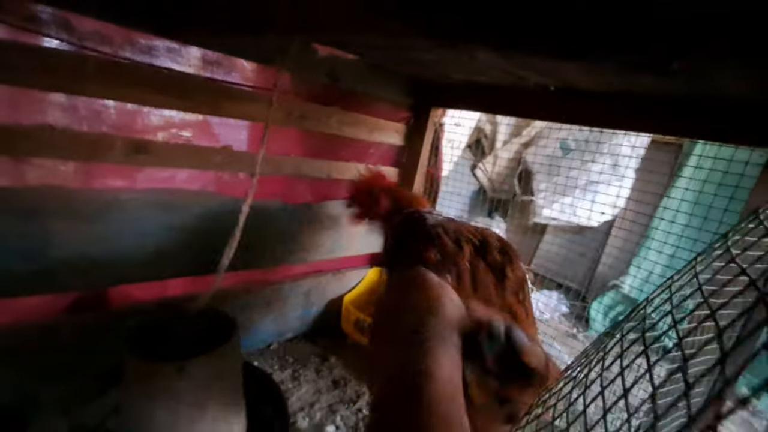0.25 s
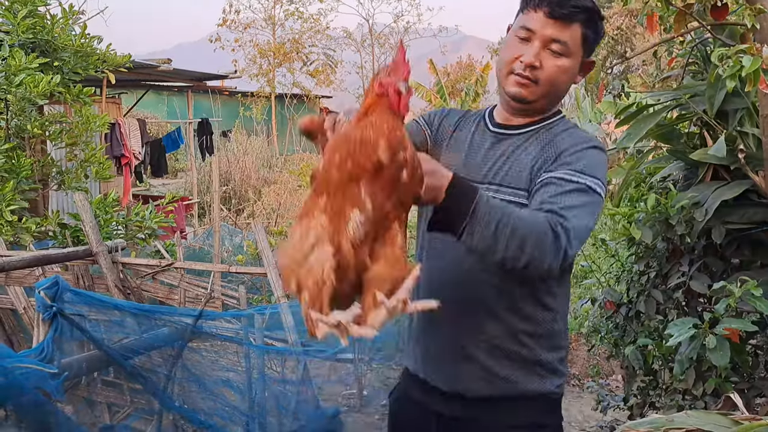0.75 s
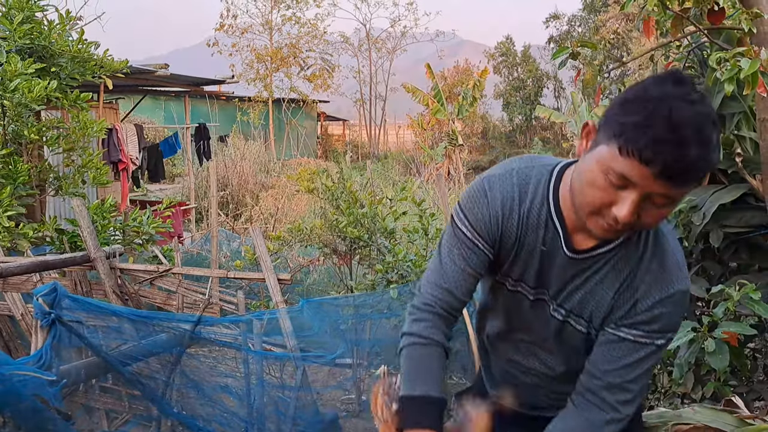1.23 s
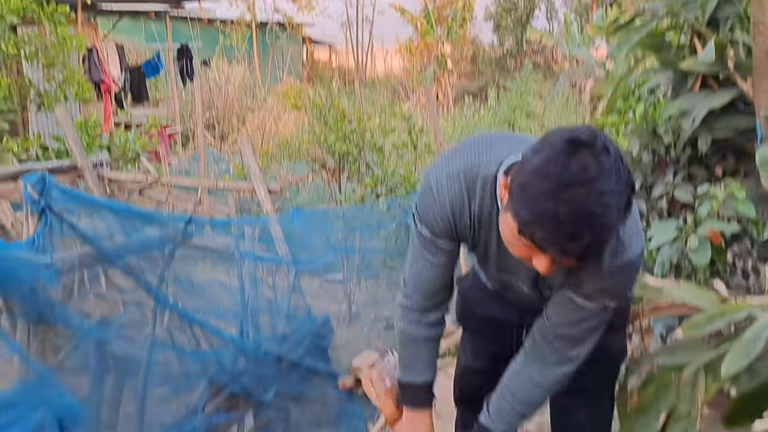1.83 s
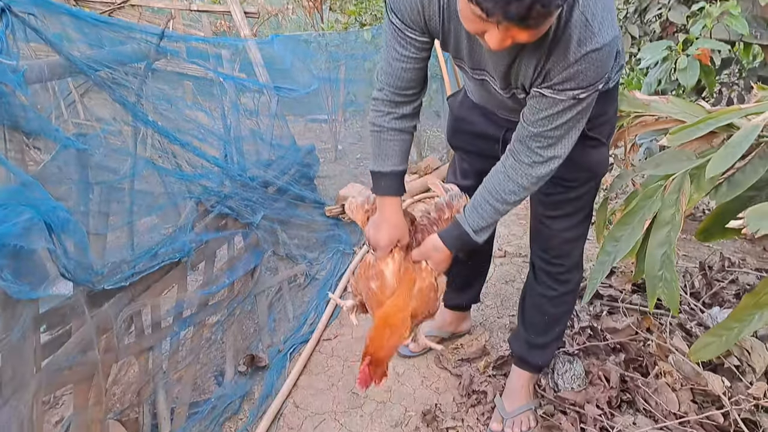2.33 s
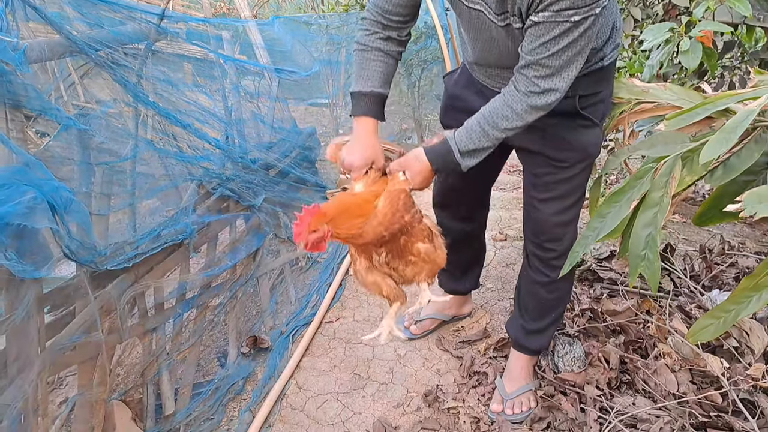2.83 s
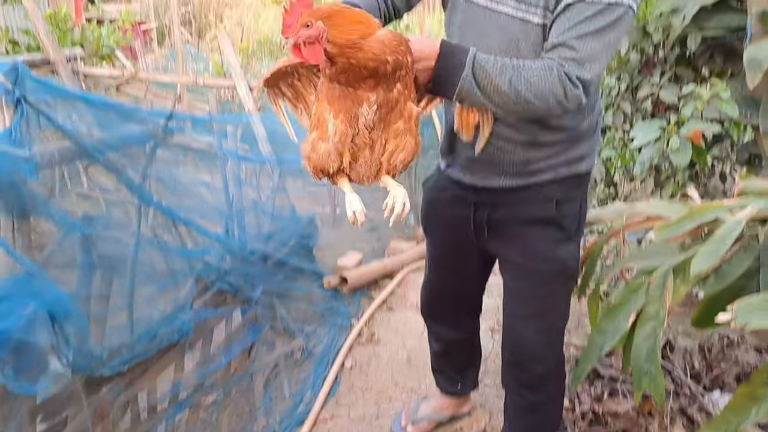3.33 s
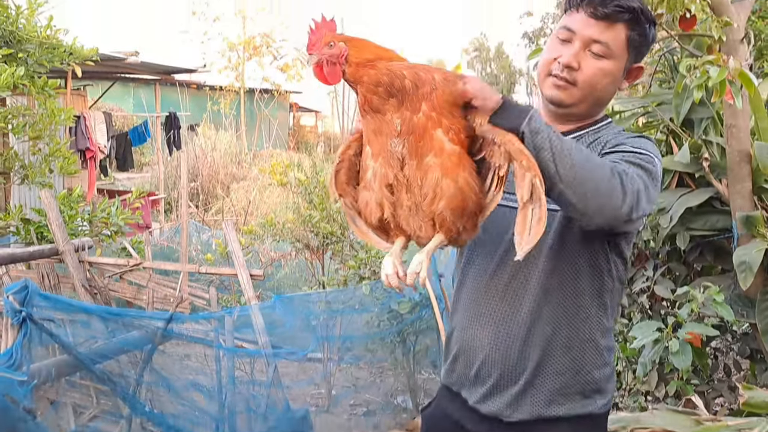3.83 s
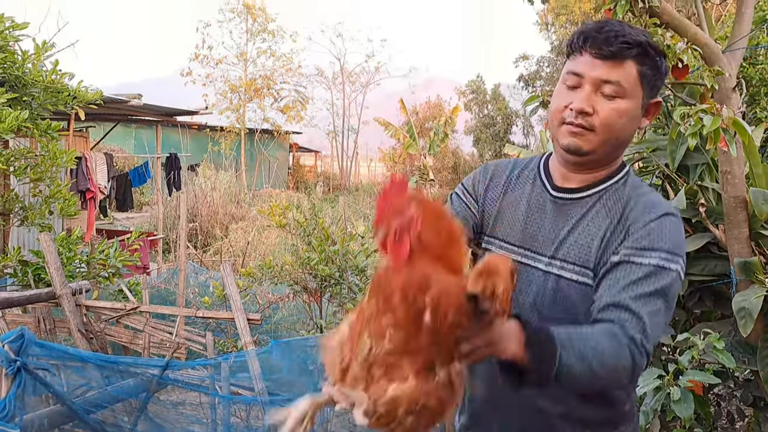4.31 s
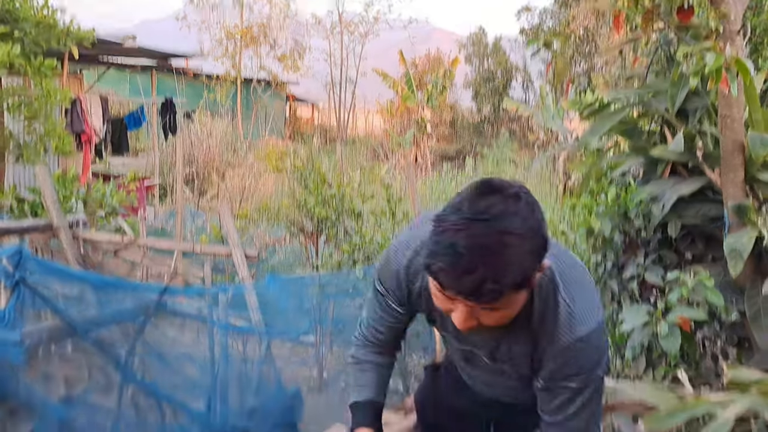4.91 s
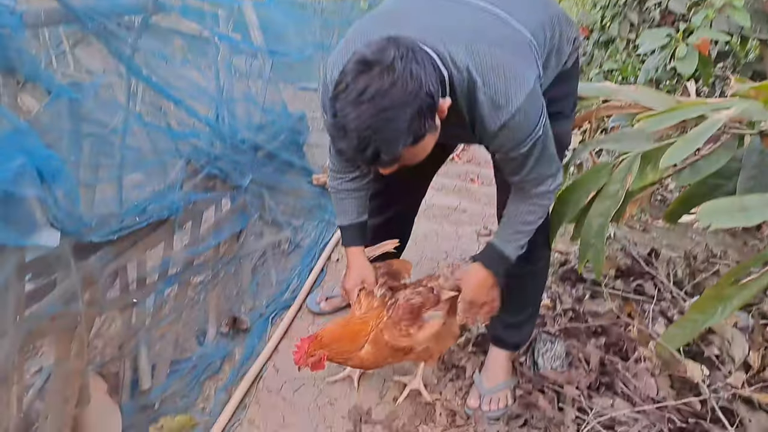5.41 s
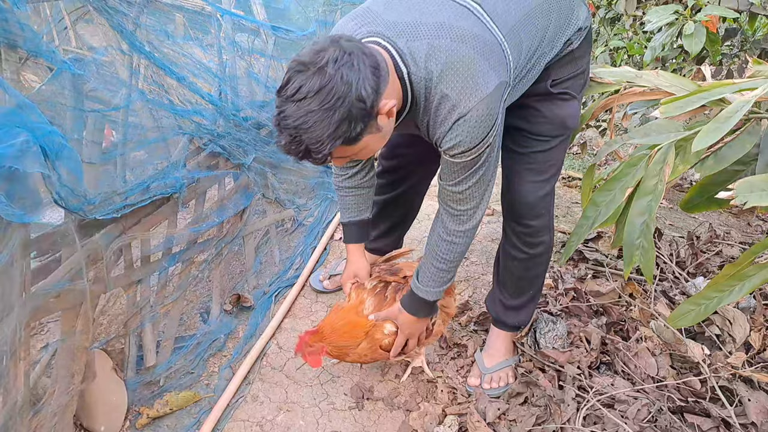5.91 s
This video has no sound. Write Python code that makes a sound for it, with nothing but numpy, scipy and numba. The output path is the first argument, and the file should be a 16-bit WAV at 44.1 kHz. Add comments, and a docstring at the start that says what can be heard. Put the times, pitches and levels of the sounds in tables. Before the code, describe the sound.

Close up in a small boxy coop, a chicken clucks fast and gruffly with feather rustle and hard thumps. An abrupt cut opens to a yard: a wing flurry, a harsh scream, then shorter whines and clucks. Other chickens answer faintly over a soft distant engine. The bird squawks twice more, and dry leaves snap underfoot before it quiets.

```python
"""A chicken clucks in a boxy coop as it is grabbed, then screams, flaps and squawks while held out in a yard.
Its rough syrinx is a jittered pulse train with noise, ringing a throat resonance that moves with the beak.
Other chickens answer from further off by the same mechanism, and a songbird whistles once.
Rustling feathers and leaves are grainy noise; wings and feet thump as damped noise with a low ring.
Dry leaves tick as resonant cracks; a distant engine idles as low harmonics and rumble over soft air noise."""
import sys
import numpy as np
from scipy import signal
from scipy.fft import rfft, irfft, next_fast_len
from scipy.io import wavfile
from scipy.ndimage import uniform_filter1d
from numba import njit

SR = 44100
rng = np.random.default_rng(int(sys.argv[2]) if len(sys.argv) > 2 else 0)


def file_out(sig):
    """Save sig as 16-bit WAV at sys.argv[1]."""
    # one column per channel
    cols = np.atleast_2d(sig).T
    # limit, then scale
    lim = np.clip(cols, -1, 1)
    pcm = np.round(lim * 32767).astype(np.int16)
    wavfile.write(sys.argv[1], SR, pcm)


N = 271744
T = np.arange(N) / SR
YARD_S, LIFTED_S = 0.69, 3.0  # coop gives way to yard; held bird is lifted
SILENT_DB = -80
# a call starts flat and closed, and sags as the beak shuts: factors on pitch and throat resonance
ONSET_BEND, ONSET_THROAT = 0.86, 0.65
END_BEND, END_THROAT = 0.88, 0.62

# feather noise spectrum in the coop: hz, gain_db
COOP_FEATHER_SPECTRUM = [(88, -36), (150, -8.5), (431, -14.5), (805, -11.5), (960, -32), (1450, -9.5),
                         (2920, -19.5), (3770, -17), (4240, -20), (13400, -22.5), (16000, -27)]
# left minus right in the yard: hz, difference_db
YARD_LEFT_RIGHT = [(300, -3), (1100, -0.2), (2200, 4.5), (4300, 15.5), (6000, 12), (8500, 2.5),
                   (12000, -11.5)]


def undb(db):
    """Decibels to gain."""
    return 10 ** (np.asarray(db) / 20)


def unit(x):
    """Scale to rms 1."""
    return x / np.sqrt(np.mean(x ** 2) + 1e-18)


def even(x, size=400):
    """Hold the short-term rms at 1; size in samples."""
    return x / np.sqrt(np.abs(uniform_filter1d(x ** 2, size)) + 1e-12)


def on_bins(points, size):
    """Interpolate (Hz, dB) points over log frequency to a gain per FFT bin."""
    hz, db = np.transpose(points)
    bin_hz = np.fft.rfftfreq(size, 1 / SR)
    return undb(np.interp(np.log(bin_hz + 1), np.log(hz), db))


def colour(x, points):
    """Filter by a spectrum of (Hz, dB) points."""
    size = next_fast_len(x.shape[-1] + 1024)
    return irfft(rfft(x, size) * on_bins(points, size), size)[..., :x.shape[-1]]


def walk(t, rate_hz):
    """Random levels, rate_hz a second, joined by lines."""
    place = (t - t[0]) * rate_hz
    levels = rng.standard_normal(2 ** 14)
    i = place.astype(int) % (2 ** 14 - 1)
    return levels[i] + place % 1 * (levels[i + 1] - levels[i])


def add(out, start_s, x):
    """Mix x into out from start_s."""
    i = max(int(start_s * SR), 0)
    out[i:i + len(x)] += x[:N - i]


@njit
def resonate(x, hz, q):
    """State-variable band-pass with a moving centre."""
    y, band, low = np.empty(len(x)), 0., 0.
    for i in range(len(x)):
        g = np.tan(np.pi * min(hz[i] / SR, .45))
        v = (band + g * (x[i] - low)) / (1 + g * (g + 1 / q))
        band, low, y[i] = 2 * v - band, low + 2 * g * v, v / q
    return y


def stereo(x, left_right, lag_ms):
    """Left and right differ in level by frequency at constant total power; the right lags."""
    size = next_fast_len(N + 1024)
    ratio = on_bins(left_right, size)
    lag = np.exp(-2j * np.pi * np.fft.rfftfreq(size, 1 / SR) * lag_ms / 1000)
    gains = np.array([ratio, lag]) * np.sqrt(2 / (1 + ratio ** 2))
    return irfft(rfft(x, size) * gains, size)[:, :N]


def echoes(x, t60_s, wet_db, dull_hz, delay_s):
    """Scattered reflections: dulled, exponentially decaying noise, independent left and right."""
    t = T[:SR * 3 // 4]
    tail = rng.standard_normal((2, len(t))) * np.exp(-np.log(1000) * t / t60_s) * (t > delay_s)
    tail /= np.sqrt(np.sum(tail[0] ** 2))
    tail = signal.lfilter(*signal.butter(1, dull_hz, fs=SR), tail)
    return undb(wet_db) * signal.fftconvolve(x[None], tail, axes=1)[:, :N]


def engine():
    """A distant engine throbs at three unsteady low harmonics over rumble, swelling and falling."""
    # rumble spectrum: hz, gain_db
    rumble_spectrum = [(21, -32.5), (35, -14), (60, 6), (114, -0.5), (127, -3), (151, -27), (220, -51.5),
                       (290, -54.5), (480, -120)]
    engine_hz, peak_s, peak_db, coop_db = 57, 3.78, -42, -63
    rise_db_per_s, fall_db_per_s = 3, 6.5
    phase = 2 * np.pi * np.cumsum(engine_hz * (1 + .03 * walk(T, 13))) / SR
    throb = unit(np.sin(phase) + 1.1 * np.sin(2 * phase) + 0.033 * np.sin(3 * phase))
    noise = rng.standard_normal(N) + 0.12 * rng.standard_normal((2, N))  # mostly shared left and right
    rumble = unit(colour(noise, rumble_spectrum))
    swell_db = peak_db - np.maximum((peak_s - T) * rise_db_per_s, (T - peak_s) * fall_db_per_s)
    level = undb(np.where(T < YARD_S, coop_db, swell_db))
    return unit(throb + undb(3.5) * rumble) * level * undb([[1.4], [-1.4]])


def outdoor_air():
    """Soft, nearly mono coloured noise with a wandering level."""
    # air spectrum: hz, gain_db
    air_spectrum = [(59, -21.5), (100, -1), (163, -6), (621, -15.5), (768, -14), (1200, -25.5),
                    (1580, -33.5), (1910, -25), (4980, -35.5), (12400, -53.5), (16000, -37.5)]
    noise = rng.standard_normal(N) + 0.13 * rng.standard_normal((2, N))
    return unit(colour(noise, air_spectrum)) * undb(-57 + 3.3 * walk(T, 9.9) + walk(T, 33))


def songbird(start_s, length_s, from_hz, to_hz, level_db):
    """One thin falling whistle from far-off trees: a sine under a half-sine envelope."""
    out, part = np.zeros(N), np.linspace(0, 1, int(length_s * SR))
    hz = from_hz + (to_hz - from_hz) * part
    add(out, start_s, undb(level_db) * np.sin(np.pi * part) * np.sin(2 * np.pi * np.cumsum(hz) / SR))
    return out


def bursts(rows):
    """Gain of rustles that each swell and die exponentially; overlaps add in power."""
    power = 0
    for peak_s, level_db, rise_s, fall_s in rows:
        power = power + undb(2 * level_db) * np.exp(-2 * np.maximum((peak_s - T) / rise_s, (T - peak_s) / fall_s))
    return np.sqrt(power)


def rustle(gain, spectrum, grain_db, flutter_db):
    """Countless barbs or leaves catch and slip, in patches; left and right get their own grains."""
    grains = rng.standard_normal((2, N)) * undb(grain_db * walk(T, 1500))
    patches = undb(flutter_db * walk(T, 120))
    return unit(colour(grains, spectrum) * patches) * gain


def ticks(decay_s, q, gain_db):
    """Dry leaves and twigs snap: each a brief crack with a broad resonance."""
    # snaps: start_s, level_db (before gain_db), resonance_hz
    snaps = [(1.125, -34.5, 2090), (1.1872, -38.5, 3080), (3.2702, -52, 2420), (4.435, -31, 4150),
             (4.4494, -45, 4070), (4.7094, -31, 5900), (5.1766, -38, 5300), (5.3833, -28, 12200),
             (5.419, -25, 10170), (5.546, -41.5, 12000), (5.5797, -40.5, 5080), (6.0205, -40.5, 7550),
             (6.1133, -51, 6560)]
    out, t = np.zeros(N), T[:SR // 30]
    for start_s, level_db, hz in snaps:
        burst = rng.standard_normal(len(t)) * np.exp(-t / decay_s)
        crack = resonate(burst, np.full(len(t), float(hz)), float(q))
        add(out, start_s, undb(level_db + gain_db) * crack / np.abs(crack).max())
    return out


def leaves():
    """Dry leaves rustle and snap underfoot."""
    # steps: peak_s, level_db, rise_s, fall_s
    steps = [(5.185, -51.5, 0.15, 0.065), (5.39, -28.5, 0.013, 0.015), (5.42, -36, .03, 0.016),
             (5.44, -47, 0.19, 0.12), (6.12, -60.5, 0.259, 0.23)]
    # leaf noise spectrum: hz, gain_db
    leaf_spectrum = [(180, -44), (300, -16), (398, -2.5), (494, -20.5), (801, -15.5), (946, -13),
                     (1190, -11.5), (5160, -5.5), (12500, -11.5), (16000, -15.5)]
    return rustle(bursts(steps), leaf_spectrum, grain_db=3, flutter_db=3.0) + ticks(decay_s=0.0035, q=1.0, gain_db=5.5)


def wings():
    """Wings and feathers rustle in the yard."""
    # wingbeats: peak_s, level_db, rise_s, fall_s
    wingbeats = [(.83, -17.5, .085, .098), (1.52, -48.5, .3, .42), (3.8, -54.5, .6, .3),
                 (4.11, -41.5, .06, .08), (4.44, -47, .2, .1), (4.7, -47.5, .08, .05)]
    # feather noise spectrum: hz, gain_db
    wing_spectrum = [(88, -57.5), (150, -33), (231, -24.5), (534, -15), (589, -21.5), (923, -3.5),
                     (1240, -9), (3350, -3), (3620, -3), (6510, -7), (7320, -13), (12700, -11.5),
                     (16000, -27)]
    beats = rustle(bursts(wingbeats) * (T > YARD_S), wing_spectrum, grain_db=3.5, flutter_db=2.0)
    return stereo(beats, YARD_LEFT_RIGHT, lag_ms=0)


def scuffles():
    """Feathers rustle against hands and coop over a steady bed of rustling."""
    # scuffle bursts: peak_s, level_db, rise_s, fall_s
    scuffle_bursts = [(.125, -40, 0.024, 0.11), (.255, -36, 0.015, 0.033), (.33, -39.5, 0.059, 0.055),
                      (.5, -30, .025, .025), (.56, -18, 0.019, 0.013), (.615, -21.5, 0.0015, 0.031)]
    gain = np.hypot(bursts(scuffle_bursts), undb(-51.5)) * (T < YARD_S)
    return rustle(gain, COOP_FEATHER_SPECTRUM, grain_db=3.0, flutter_db=0.5)


def flap():
    """A wing beats against the arm: feather noise without its treble."""
    # the wing stroke: peak_s, level_db, rise_s, fall_s
    wing_stroke = (.48, -22, .008, .02)
    stroke = rustle(bursts([wing_stroke]), COOP_FEATHER_SPECTRUM, grain_db=2.5, flutter_db=3)
    return signal.sosfilt(signal.butter(2, 2800, fs=SR, output="sos"), stroke)


def thumps(board_hz, board_db):
    """Blows of wings and feet: quickly damped dull noise and a low ring, without deep bass."""
    # blows: start_s, level_db, decay_s
    blows = [(.484, -17, 0.042), (0.531, -25.5, 0.027), (0.637, -6.5, 0.012), (0.659, -10, 0.0068),
             (1.061, -37.5, 0.043), (1.604, -38, 0.022), (4.259, -41.5, 0.034)]
    # blow noise spectrum: hz, gain_db
    blow_spectrum = [(24, -35.5), (40, 2.5), (197, -11), (315, -10), (573, -15.5), (670, -14.5),
                     (750, -21.5), (841, -4.5), (956, -22), (1200, -32.5), (1560, -57), (2640, -120)]
    out, t = np.zeros(N), T[:SR // 4]
    for start_s, level_db, decay_s in blows:
        boom = even(colour(rng.standard_normal(len(t)), blow_spectrum), size=700)
        boom += undb(board_db) * np.sin(2 * np.pi * board_hz * t)
        add(out, start_s, undb(level_db) * boom * (1 - np.exp(-t / 0.001)) * np.exp(-t / decay_s))
    return signal.sosfilt(signal.butter(4, 55, "high", fs=SR, output="sos"), out)


def syrinx(t, phase, hz, count=38):
    """Overtones of the pulse train; the windpipe spreads each pulse, its resonances shift as the neck twists."""
    out = 0
    for k in range(2, count):
        shift_db = min(.7 * (k - 1), 4) * walk(t, 24)
        out = out + undb(shift_db) * np.cos(k * phase + .17 * k ** 2) * (k * hz < SR / 2)
    return unit(out)


def voice(rows, rasp_spectrum, q, jitter):
    """Syrinx pulses, uneven and noisy when forced, ring the throat; upper harmonics and air rasp."""
    # rows: time_s, pitch_hz, roughness, level_db, throat_hz, fundamental_db re throat, rasp_db re level
    s, hz, rough, db, throat_hz, root_db, rasp_db = np.transpose(rows)
    t = np.arange(int(s[0] * SR), int(s[-1] * SR)) / SR
    controls = (hz, rough, undb(db), throat_hz, root_db, rasp_db)
    hz, rough, loud, throat_hz, root_db, rasp_db = (np.interp(t, s, c) for c in controls)
    wobble = jitter * rough * walk(t, 600) + .006 * walk(t, 110)
    phase = 2 * np.pi * np.cumsum(hz * (1 + wobble)) / SR
    # under strain every second pulse weakens, and air bursts through once a cycle
    overtones = syrinx(t, phase, hz) * (1 + .62 * rough * np.cos(phase / 2))
    air = unit(rng.standard_normal(len(t)) * (1 + .5 * np.cos(phase)))
    source = overtones + 1.7 * np.abs(rough) ** 1.8 * air
    throat = even(resonate(resonate(source, throat_hz, float(q)), throat_hz, float(q)))
    root_noise = unit(resonate(resonate(air, hz, 3.0), hz, 3.0))
    root = even(np.sin(phase) + 1.1 * rough * root_noise)
    # the louder the call, the more turbulent air in its treble
    treble = signal.butter(6, 2550, "high", fs=SR, output="sos")
    rasp = even(colour(signal.sosfilt(treble, source + 2.2 * loud * air), rasp_spectrum))
    body = (throat + undb(root_db) * root) / np.sqrt(1 + undb(root_db) ** 2)
    # a forced syrinx sputters
    sputter = undb(rough * (1.8 * walk(t, 350) + 2 * walk(t, 110)))
    out = np.zeros(N)
    add(out, s[0], loud * sputter * (body + undb(rasp_db) * rasp))
    return out


def softening(db):
    """As the bird eases off, the rasp fades faster than the note: 0.41 dB per dB, over 17 dB."""
    return 0.41 * np.maximum(np.asarray(db) - np.max(db), -17)


def cluck(row, rasp_spectrum, q, jitter):
    """A cluck starts gruff and flat, clears at the top of its arch, then sags and fades."""
    s, rise, fall, db, hz, glide, rough, throat_hz, root_db, rasp_db = row
    attack, clearing = min(.009, rise / 2), min(.011, rise / 2)  # s
    times = np.array([0, attack, rise - clearing, rise, rise + fall / 2, rise + fall])
    opening = np.array([1.5, 1, .4, 0, 0, 0])
    closing = np.array([0, 0, 0, 0, .3, 1])
    glide_octaves = glide / 12 * (times - rise) / (rise + fall)
    pitch = hz * ONSET_BEND ** opening * END_BEND ** closing * 2 ** glide_octaves
    throat = throat_hz * ONSET_THROAT ** opening * END_THROAT ** closing
    roughness = np.clip(rough + 0.332 * opening + 0.093 * closing, 0, 1)
    level = [SILENT_DB, db - 10.5, db - 8.5, db, db - 8.5, SILENT_DB]
    root = np.where(opening > 0, min(root_db, 11), root_db)  # weaker fundamental while gruff
    rasp = rasp_db + softening(level)
    rows = np.column_stack([s + times, pitch, roughness, level, throat, root, rasp])
    return voice(rows, rasp_spectrum, q, jitter)


def clucks(start_s, end_s, rasp_spectrum, q, jitter):
    """All the main bird's short clucks that start between two times."""
    # clucks: start_s, rise_s, fall_s, level_db, pitch_hz (at the peak), glide_semitones, roughness (0-1),
    # throat_hz, fundamental_db (re throat), rasp_db (re level)
    cluck_rows = [(0.043, 0.023, 0.042, -19, 611.3, -7, 0.25, 1030, 38, -37),
                  (0.119, 0.017, 0.013, -17, 482.4, 4.5, .65, 920, -8.5, -40),
                  (0.139, .016, 0.067, -6, 588.7, 0, 0.11, 1610, 21.5, -24),
                  (.275, .032, 0.026, -10.5, 540, 2.5, 0.42, 910, 20, -28.5),
                  (.324, .018, 0.022, -13.5, 392.3, 2, .5, 740, -6, -47.5),
                  (0.43, 0.029, 0.011, -5.5, 583, -2.5, 0.36, 1026, 29, -32),
                  (.512, 0.021, .034, -10, 590.3, -3, 0.25, 1100, 34, -45.5),
                  (.628, .016, 0.026, -19.5, 372.5, 3, 0.21, 740, -21.5, -35),
                  (1.348, 0.03, 0.028, -19.5, 485.7, -0.5, 0.15, 1130, -13, -10.5),
                  (1.742, 0.035, 0.04, -21, 433.7, -2, 0, 1390, -9.5, -10),
                  (3.951, .031, .028, -16, 413.9, 0.5, .7, 924, -9.5, -13.5),
                  (4.04, .037, .015, -14.5, 434.7, 5, .25, 840, -12, -20),
                  (4.908, 0.029, 0.031, -18, 471.3, 2.5, 0.14, 1100, -2, -14.5),
                  (5.322, 0.026, 0.021, -18.5, 419, 3.5, 0, 856, -11, -16.5),
                  (5.885, 0.028, 0.044, -22, 406.3, 3.5, 0.22, 983, 2.5, -14.5)]
    return sum(cluck(row, rasp_spectrum, q, jitter) for row in cluck_rows if start_s <= row[0] < end_s)


def squawk(controls, rasp_spectrum, q, jitter, strain, gain_db, root_db, rasp_db):
    """A long call with quick attack and release; the rasp follows the opening of the beak."""
    s, hz, rough, db, throat_hz = np.transpose([controls[0], *controls, controls[-1]]).astype(float)
    s[0] -= .01  # attack, s
    s[-1] += .0073  # release, s
    db[[0, -1]] = SILENT_DB
    hz[[0, -1]] *= ONSET_BEND, END_BEND
    throat_hz[[0, -1]] *= ONSET_THROAT, END_THROAT
    # an open beak raises the throat resonance and lets out more rasp: 4.5 dB per octave
    rasp = rasp_db + 4.5 * np.log2(throat_hz / throat_hz.mean()) + softening(db)
    rough = np.clip(strain * rough, .07, 1)
    rows = np.column_stack([s, hz, rough, db + gain_db, throat_hz, np.full(len(s), root_db), rasp])
    return voice(rows, rasp_spectrum, q, jitter)


def flock():
    """Others answer with a squawk and arched clucks; low clucks are soft croons, mostly fundamental."""
    # flock clucks: start_s, length_s, level_db (before fade_db), pitch_hz, throat_hz, rasp_db (re level)
    flock_clucks = [(1.705, 0.042, -49, 688, 1370, -9), (1.88, 0.053, -45.5, 717, 1320, 1),
                    (2.277, .05, -48.5, 691.7, 1352, 4.5), (2.512, 0.053, -43.5, 688.4, 1340, -2.5),
                    (2.66, 0.054, -53, 425.3, 830, -27), (2.74, 0.054, -41.5, 704, 1290, -4.5),
                    (2.99, 0.053, -42, 696.4, 1350, -5.5), (3.073, 0.06, -55.5, 476, 940, -18),
                    (3.212, 0.074, -57.5, 398, 1067, -30), (3.444, 0.061, -47, 572, 1111, -8),
                    (3.595, 0.073, -52, 490, 1000, -14), (3.704, 0.1, -56, 505, 996, -16.5),
                    (5.26, 0.0664, -56, 344, 705, -33), (5.46, 0.11, -59, 345, 709, -30),
                    (5.6, 0.1128, -67, 444, 687, -32), (5.85, 0.047, -61, 349.4, 700, -30)]
    # answering squawk: time_s, pitch_hz, roughness (before strain), level_db, throat_hz
    answer = [(2.198, 601, 0.97, -39.5, 1100), (2.234, 591.6, 0.12, -40.5, 1530),
              (2.26, 617, 0.088, -36, 1660), (2.282, 601, 0.47, -46, 1146), (2.294, 505.6, 0.42, -34, 1110),
              (2.318, 509.6, 0.14, -33.5, 1010), (2.406, 492, 0.13, -42.5, 970),
              (2.44, 467, 0.71, -43.5, 920)]
    # rasp spectrum: hz, gain_db
    flock_rasp = [(1590, -48), (2700, -79), (3060, -8), (3480, 25), (3750, 16), (4220, 21.5), (4580, 14),
                  (5360, 14), (6170, -1.5), (16000, -15)]
    # shape of a cluck: part of length, bend (factor), roughness, fade_db
    arch = [(0, .85, 0.59, -23.5), (.35, 0.93, 0.52, 4), (.6, 1, .35, 5.5), (1, .9, 0.532, -31)]
    rows = []
    for s, length, db, hz, throat_hz, rasp_db in flock_clucks:
        root_db = np.interp(hz, (340, 500), (14, -14))
        for part, bend, rough, fade_db in arch:
            rows.append((s + part * length, hz * bend, rough, db + fade_db, throat_hz * bend, root_db, rasp_db))
    call = squawk(answer, flock_rasp, q=0.91, jitter=0.093, strain=0.87, gain_db=0, root_db=-9.5, rasp_db=-41)
    return call + voice(rows, flock_rasp, q=1.27, jitter=.05)


def coop():
    """The bird clucks and thumps in the coop's boxy ring and short echoes, amid feather noise."""
    # rasp spectrum: hz, gain_db
    coop_rasp = [(1470, -34), (2500, -27), (4240, -7.5), (4730, -3), (4950, -12), (5920, -10), (16000, -47)]
    # the small coop's boxy ring: hz, gain_db
    box_ring = [(420, 4), (600, -0.5), (740, 7.5), (950, 6), (1500, -3.5), (2300, 14), (3200, -3)]
    # left minus right: hz, difference_db
    coop_left_right = [(300, 2), (1000, 4), (2200, -7.5), (4500, 21), (12000, -15.5)]
    inside = colour(clucks(0, YARD_S, coop_rasp, q=3.6, jitter=0.14), box_ring)
    inside += thumps(board_hz=240.3, board_db=-9.5)
    direct = stereo(inside, coop_left_right, lag_ms=0)
    reflected = echoes(inside, t60_s=0.051, wet_db=-5, dull_hz=2850, delay_s=0.0036)
    return direct + reflected + scuffles() + flap()


def held_out(call, pan_db, lag_ms):
    """Each holding position has its own direction and reflections off ground and handler."""
    direct = stereo(call, YARD_LEFT_RIGHT, lag_ms) * undb(np.array([[pan_db], [-pan_db]]) / 2)
    return direct + echoes(call, t60_s=.046, wet_db=-9, dull_hz=8400, delay_s=.0013)


def held_bird():
    """The bird screams as it is swung out, complains while lowered, squawks when lifted, then cries."""
    # long calls: time_s, pitch_hz, roughness (before strain), level_db (before gain_db), throat_hz
    scream_rows, wail_rows, whine_rows = [(0.875, 619.4, 1.04, -23, 1450), (0.935, 609.4, 0.8, -12, 1870),
                                          (0.955, 606, 0.67, -17.5, 2140), (0.989, 568.2, 0.97, -13, 2090),
                                          (1.003, 502.6, 0.89, -15.5, 2020),
                                          (1.019, 503.6, 0.25, -10, 1710), (1.045, 522.7, 0, -12, 1480),
                                          (1.065, 556.5, 0.64, -14.5, 1065),
                                          (1.088, 527, 0.86, -28.5, 1000)], [(1.45, 572, 0.61, -28, 1160),
                                                          (1.464, 589, 0.85, -33, 1130),
                                                          (1.474, 541, 0.84, -26, 1120),
                                                          (1.492, 552, 0.48, -23, 1100),
                                                          (1.508, 554.4, 0.04, -26.5, 1230),
                                                          (1.528, 498.3, 0.03, -18, 1350),
                                                          (1.562, 476.7, 0.15, -24, 1220),
                                                          (1.585, 518, 1, -47, 1180)], [(1.972, 416, 0.99, -32, 1176),
                                                                        (2.006, 446.8, 0.12, -25.5, 1210),
                                                                        (2.028, 481.6, 0.55, -27, 1590),
                                                                        (2.052, 490, 0.87, -29, 1830),
                                                                        (2.064, 460, 0.47, -26.5, 1660),
                                                                        (2.084, 445, 0.42, -31, 1400),
                                                                        (2.108, 494, 0.018, -22.5, 1600),
                                                                        (2.132, 470, 0.2, -30, 1440),
                                                                        (2.155, 377, 0.99, -39.5, 1350)]
    squawk_rows, cry_rows = [(4.2, 451, 0.66, -26.5, 1310), (4.214, 428.7, 0.33, -17.5, 1320),
                             (4.226, 458, 0.06, -12, 1340), (4.262, 440.5, 0.02, -20.5, 1300),
                             (4.29, 464, 0.03, -9.5, 1320), (4.314, 479.4, 0.02, -12.5, 1340),
                             (4.354, 435.4, 0.09, -19.5, 1110), (4.362, 447, 0.19, -25.5, 1080)], [(4.539, 443.3, 0.88, -16.5, 1000),
                                             (4.547, 478, 0.45, -20.5, 1000),
                                             (4.553, 508, 0.5, -10.5, 1020),
                                             (4.595, 499, 0.94, -15.5, 1000),
                                             (4.669, 468.4, 0.21, -11, 932), (4.683, 416, 0.23, -15, 908),
                                             (4.693, 435, 0.63, -23.5, 901)]
    # rasp spectra: hz, gain_db
    scream_rasp, protest_rasp = [(1590, -32), (2700, -10), (3090, -2), (3830, -15), (4280, -3.5),
                                 (5050, -5), (5360, -5), (6600, -6), (10500, -23), (12600, -24.5),
                                 (16000, -35)], [(1590, -1), (2700, 3), (2760, -37), (3610, -11),
                                                      (3920, -7), (4190, -46), (4350, 3), (5770, 6),
                                                      (6360, -0.5), (8820, -8.5), (10300, -12.5),
                                                      (12700, -5), (16000, -24)]
    squawk_rasp, cry_rasp = [(1710, -30), (2900, -11), (3010, -12), (3090, -2), (3270, 8.5), (3940, -54.5),
                             (4610, -31.5), (4920, -37.5), (5970, 4), (6500, -9.5), (7720, 0.5),
                             (9160, -22.5), (9430, -36.5), (11900, -11.5), (16000, -21.5)], [(1590, -75.5), (2700, 0), (3020, -6), (3250, -18),
                                                  (3860, -13), (4510, -18), (4720, -13), (5200, -2.5),
                                                  (5730, -16), (7270, -21.5), (7890, -27.5), (9720, -25),
                                                  (11100, -25.5), (12500, -22), (16000, -37)]
    scream = squawk(scream_rows, scream_rasp, q=1.9, jitter=0.068, strain=0.93,
                    gain_db=-0.5, root_db=-18.5, rasp_db=-9.0)
    lowered = clucks(YARD_S, LIFTED_S, protest_rasp, q=1.12, jitter=.07)
    lowered += squawk(wail_rows, protest_rasp, q=1.25, jitter=.07, strain=1,
                      gain_db=-0.5, root_db=-6.5, rasp_db=-10)
    lowered += squawk(whine_rows, protest_rasp, q=1.27, jitter=.07, strain=.55,
                      gain_db=0.5, root_db=-10, rasp_db=-4.5)
    lifted = squawk(squawk_rows, squawk_rasp, q=1.76, jitter=.12, strain=1.6,
                    gain_db=0.5, root_db=-16.5, rasp_db=-16)
    clucks_and_cry = clucks(LIFTED_S, T[-1], cry_rasp, q=1.8, jitter=0.14)
    clucks_and_cry += squawk(cry_rows, cry_rasp, q=2.4, jitter=0.051, strain=0.91,
                             gain_db=-3.0, root_db=-12.5, rasp_db=-13.0)
    return (held_out(scream, pan_db=1.5, lag_ms=0.074) + held_out(lowered, pan_db=1.5, lag_ms=0.031)
            + held_out(lifted, pan_db=0.0, lag_ms=0.14) + held_out(clucks_and_cry, pan_db=1.5, lag_ms=0.13))


def yard():
    """The held bird and the flock with late echoes off sheds and trees, plus wings, leaves and songbird."""
    # flock, left minus right: hz, difference_db
    flock_left_right = [(500, 1.3), (4000, 19), (10000, 3.3)]
    held, others = held_bird(), flock()
    out = held + stereo(others, flock_left_right, lag_ms=0.13) + wings() + leaves()
    out += echoes(held.mean(axis=0), t60_s=0.44, wet_db=-19.5, dull_hz=3000, delay_s=0.0046)
    out += echoes(others, t60_s=0.21, wet_db=-1, dull_hz=4630, delay_s=0.00057)
    return out + songbird(start_s=5.6, length_s=0.22, from_hz=4800, to_hz=4700, level_db=-70)


def scene():
    """First the coop, then the open yard; the level dips briefly between them."""
    # overall level, held beyond both ends: time_s, gain_db
    dip = [(.676, -5.5), (.683, -41), (.706, -35), (.712, -1)]
    gain = undb(np.interp(T, *np.transpose(dip)))
    return (coop() + yard() + engine() + outdoor_air()) * gain


def record(dry):
    """Round the loudest peaks and cut the top above 16.2 kHz."""
    rounded = dry / (1 + (dry / .92) ** 8) ** (1 / 8)
    return signal.sosfilt(signal.ellip(8, .2, 70, 16200, fs=SR, output="sos"), rounded)


dry = scene()
out = record(dry)
file_out(out)
```